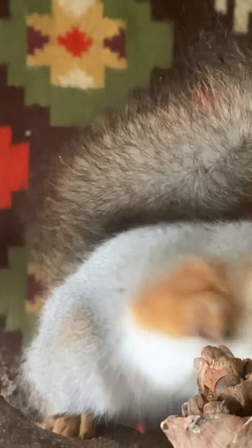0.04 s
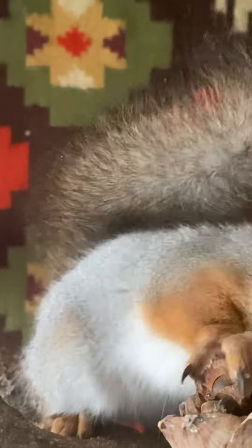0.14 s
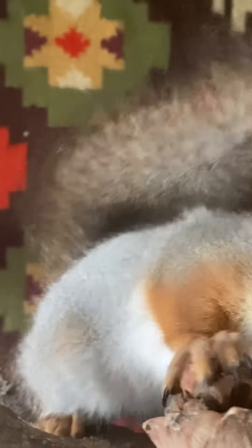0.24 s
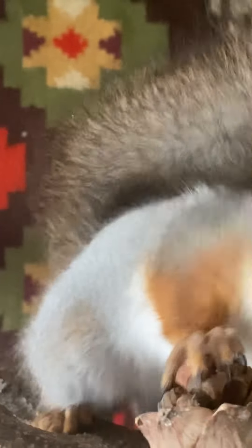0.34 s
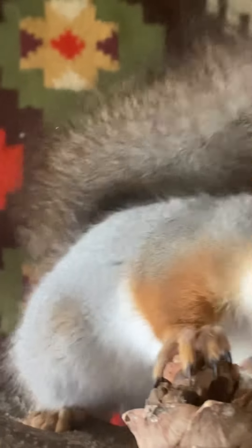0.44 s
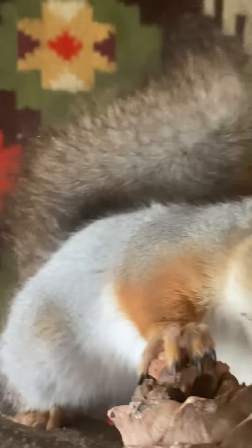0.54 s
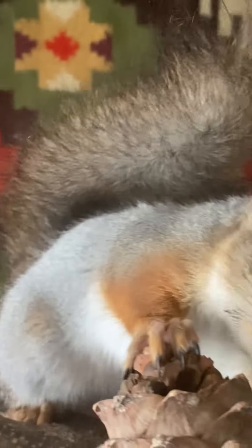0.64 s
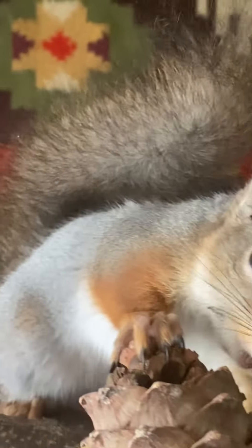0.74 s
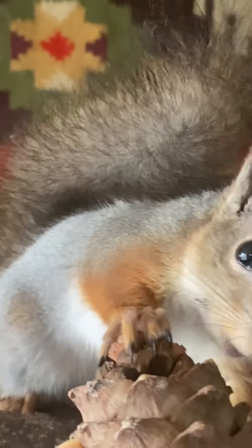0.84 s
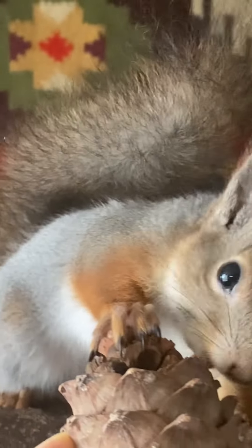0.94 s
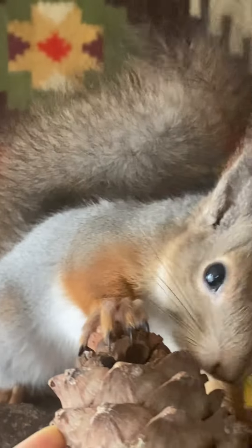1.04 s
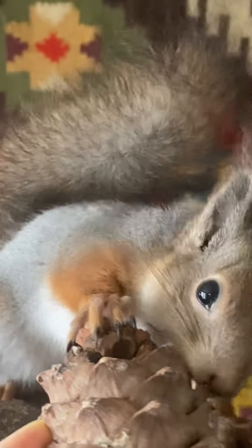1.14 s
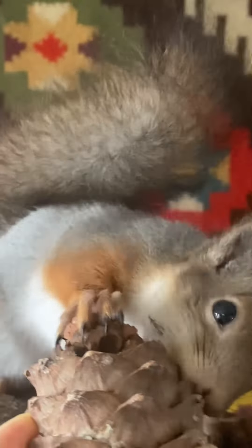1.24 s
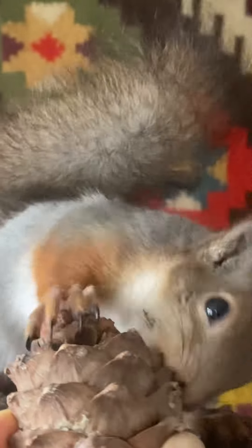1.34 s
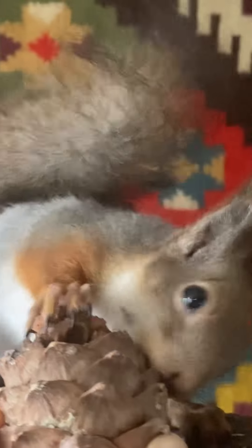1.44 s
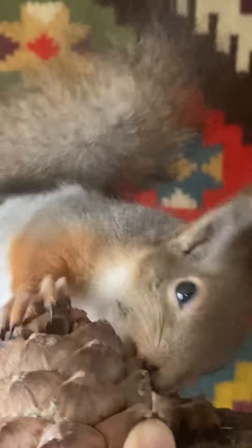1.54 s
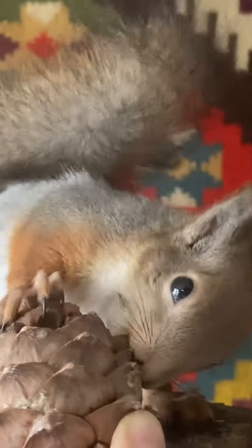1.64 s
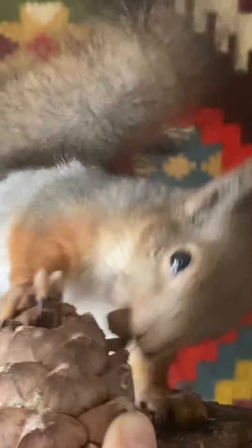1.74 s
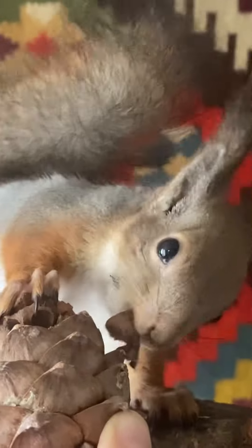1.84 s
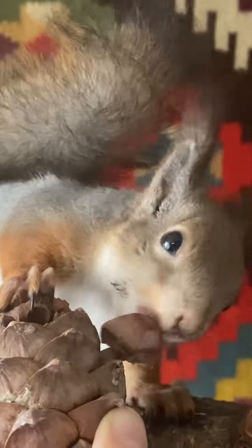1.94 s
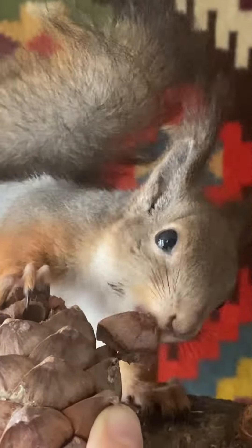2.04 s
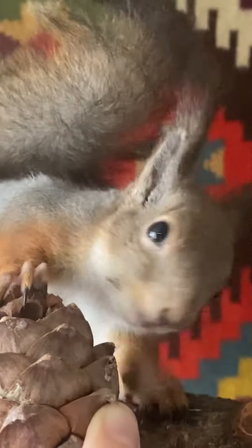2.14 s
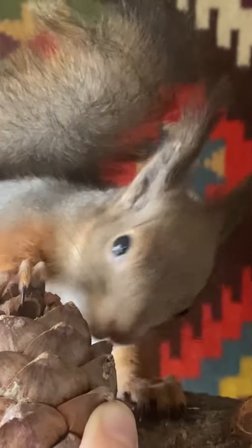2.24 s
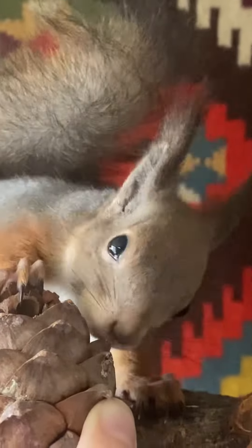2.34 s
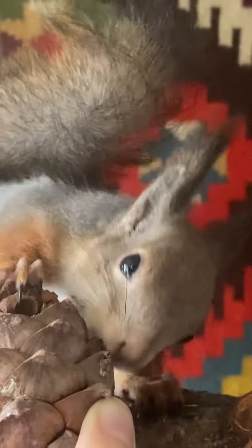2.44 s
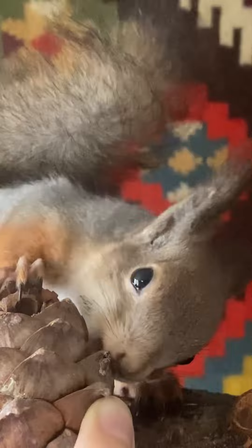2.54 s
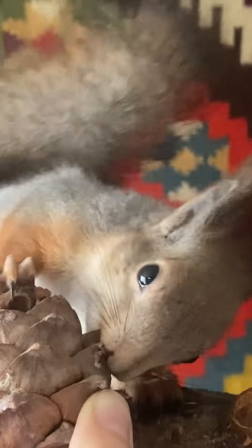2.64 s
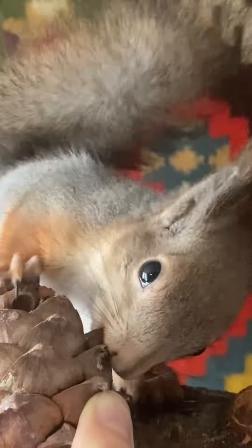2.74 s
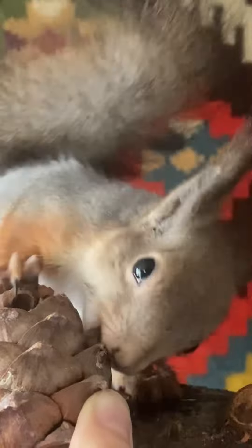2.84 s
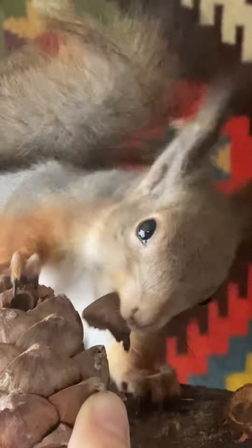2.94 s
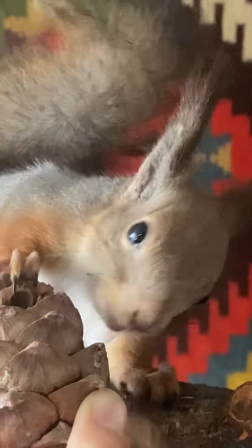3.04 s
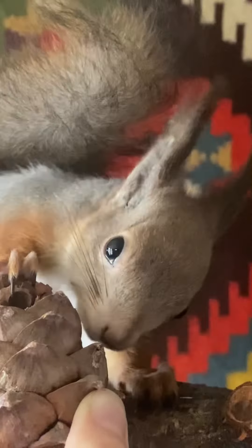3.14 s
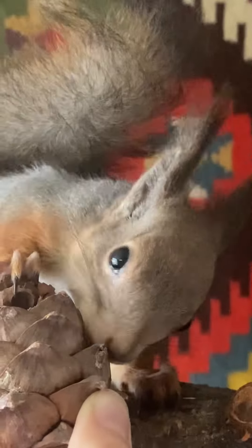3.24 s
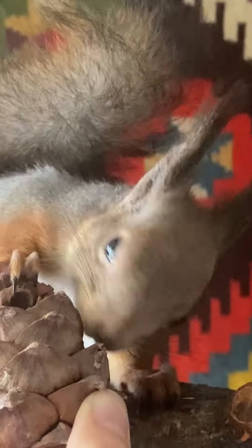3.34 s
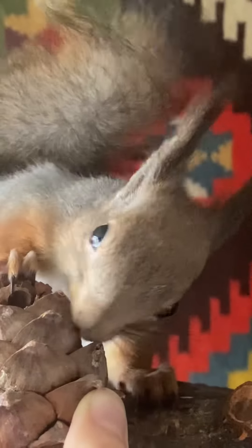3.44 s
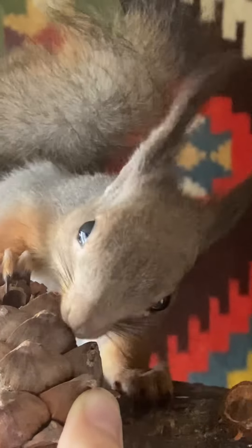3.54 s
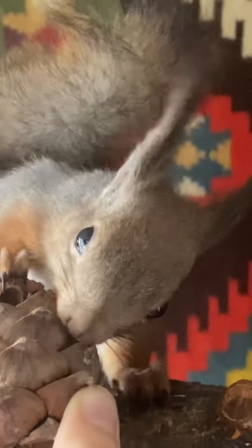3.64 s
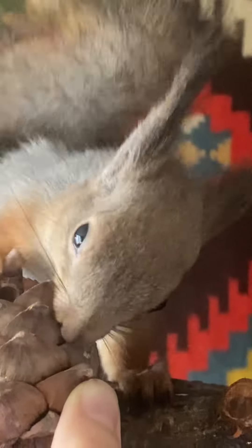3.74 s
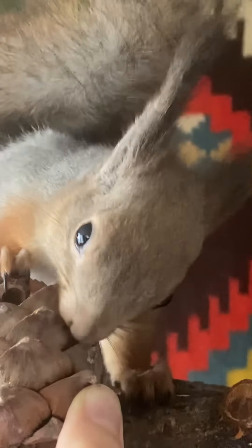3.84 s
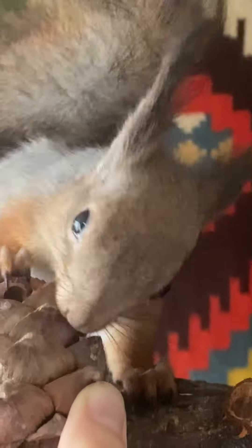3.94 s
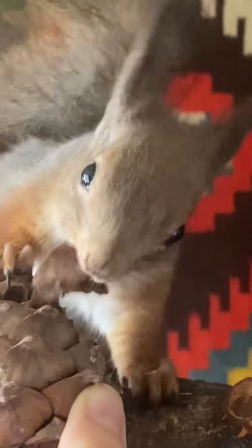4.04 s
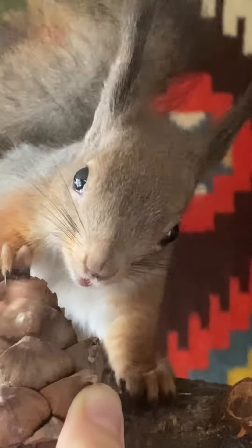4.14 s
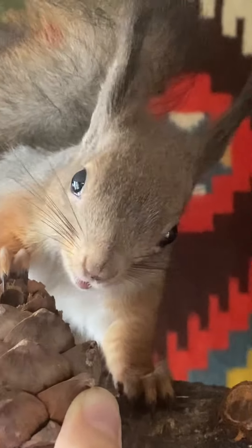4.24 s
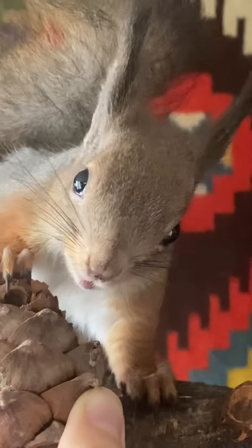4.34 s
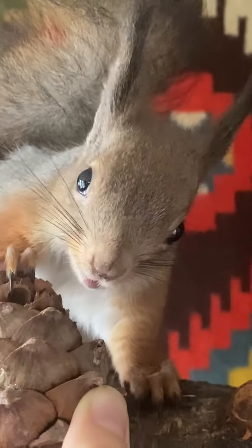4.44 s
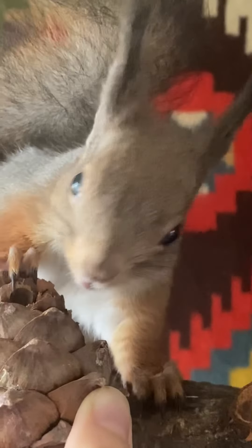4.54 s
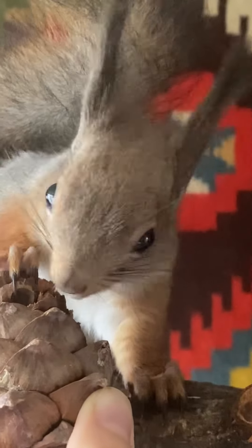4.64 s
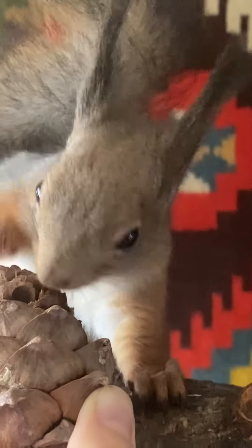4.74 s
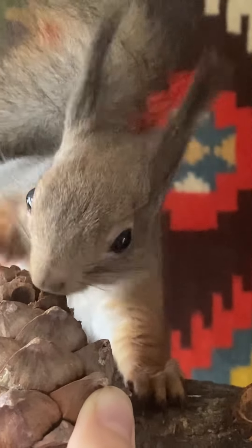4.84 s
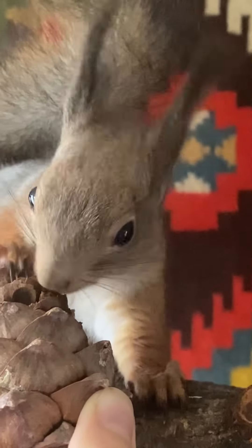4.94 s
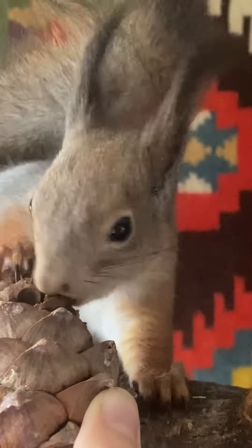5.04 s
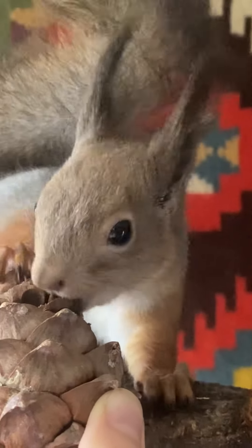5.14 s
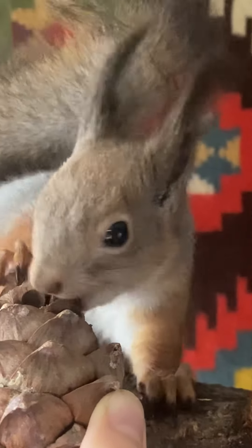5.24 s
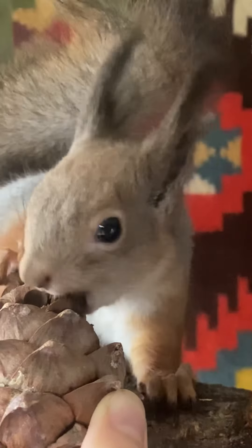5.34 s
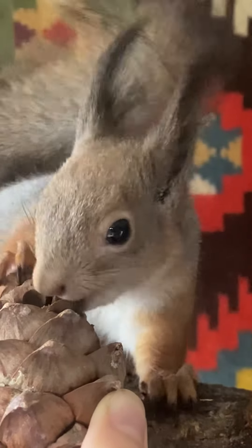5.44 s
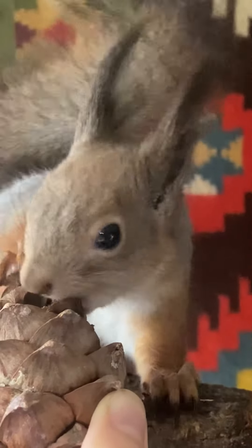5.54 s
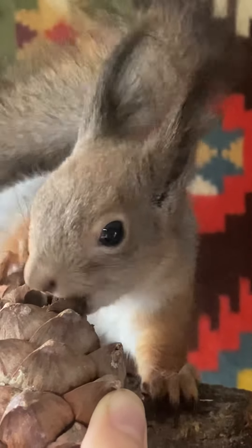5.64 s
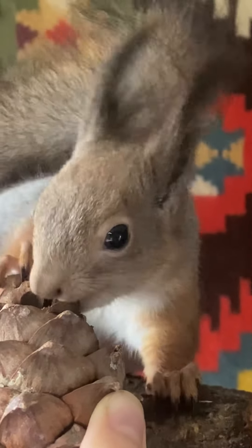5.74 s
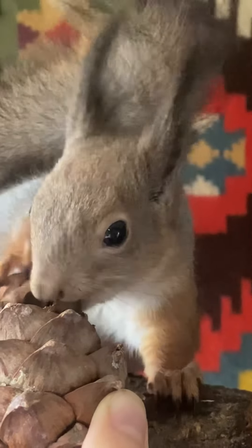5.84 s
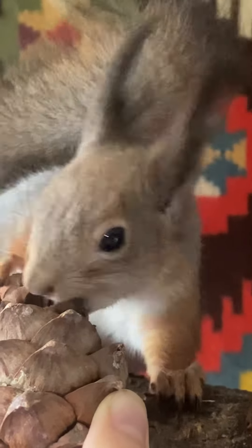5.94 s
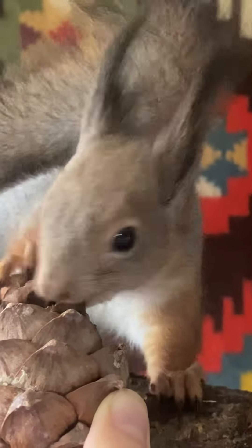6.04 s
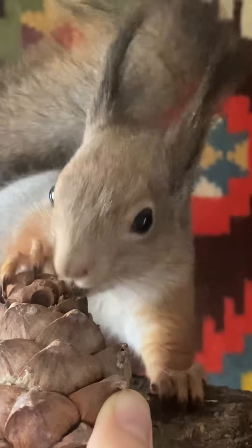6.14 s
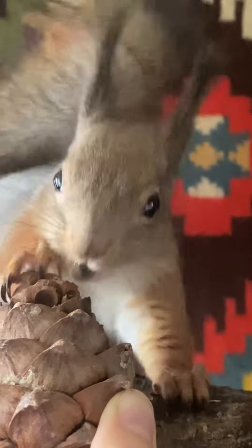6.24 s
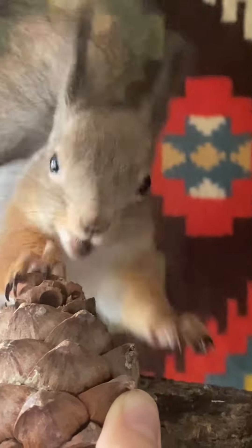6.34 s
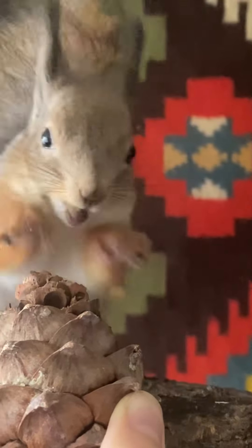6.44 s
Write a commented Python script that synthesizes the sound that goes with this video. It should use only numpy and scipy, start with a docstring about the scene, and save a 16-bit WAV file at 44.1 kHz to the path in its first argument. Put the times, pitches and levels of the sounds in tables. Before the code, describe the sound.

Very close to a stereo microphone pair in a small, damped room, a squirrel gnaws a pine cone. A flurry of bright dry cracks comes first, then a near-silent gap, then stronger clusters of snapping with scraping and small knocks. After about four seconds it thins to faint ticks, with one distinct clack near five seconds. A soft low hum continues underneath.

```python
"""In a small, well-damped room a squirrel gnaws a pine cone a hand's width from two closely spaced microphones.
Its teeth snap the woody scales in bursts of dry cracks: noise bursts a few milliseconds long, each tinted by a resonance.
Between the bites come tiny ticks and rustle, noise whose level follows bouts of effort.
Scales tear, shift and drop with duller knocks, a contact tick plus a diffuse clatter that fills the room.
A low hum of shaped noise and two wavering tones lies under it all."""
import sys
import numpy as np
from scipy.fft import rfft, irfft, next_fast_len
from scipy.io import wavfile
from scipy.ndimage import uniform_filter1d, map_coordinates

SR = 44100
rng = np.random.default_rng(int(sys.argv[2]) if len(sys.argv) > 2 else 0)


def transcribe(signal):
    """Save signal, clipped to [-1, 1], as a 16-bit WAV file at the path in sys.argv[1]."""
    frames = np.atleast_2d(signal).T
    limited = np.clip(frames, -1, 1)
    pcm = np.round(limited * 32767).astype(np.int16)
    wavfile.write(sys.argv[1], SR, pcm)


N = 286209  # length of the scene [samples]

# Teeth snapping fibres, direct sound:
# (time [s], level over 2 ms [dB], brightness [dB per octave], pitch of the breaking piece [Hz])
CRACKS = [(0.1248, -52.5, -5.5, 9100), (0.155, -51, 1, 9700), (0.1807, -25, 1, 10800),
          (0.205, -36, 7.5, 10000), (0.22, -48, -2, 6800), (0.2345, -39, 8.5, 9700),
          (0.2385, -36.5, 1, 9700), (0.251, -26, 7.5, 9500), (0.2556, -28, 3.5, 900),
          (0.285, -38.5, 5.5, 9600), (0.301, -26, 3.5, 9700), (0.3053, -26, 3, 1450),
          (0.4212, -40.5, 3.5, 10000), (0.4361, -48.5, -4.5, 6300), (0.5957, -56.5, 3, 11900),
          (0.6712, -54, -1.5, 5300), (0.686, -55.5, -2, 5830), (0.7468, -56.5, -1.5, 9900),
          (0.809, -58.5, 3, 3530), (0.8588, -52, 6, 6300), (1.0096, -61.5, -6, 5900),
          (1.0423, -53.5, -1, 6660), (1.2803, -23.5, -0.5, 7500), (1.289, -37, -2.5, 8650),
          (1.3253, -46, -7, 1130), (1.423, -51.5, -4, 5100), (1.5145, -47, 2.5, 6800),
          (1.5726, -21, 6, 7750), (1.5845, -35, 0, 6300), (1.601, -36.5, 3.5, 9700),
          (1.604, -20.5, 1.5, 4400), (1.6116, -24, 1.5, 5900), (1.651, -40.5, -1, 12000),
          (1.7066, -25.5, 1.5, 4900), (1.85, -50, -12, 1920), (1.9224, -50.5, -6, 10000),
          (2.1414, -45, -5.5, 4300), (2.165, -53.5, -8.5, 7350), (2.172, -35, 7, 6700),
          (2.4265, -50, -2.5, 3330), (2.5065, -43, -1.5, 4400), (2.5719, -26, 5, 2500),
          (2.6024, -33.5, -1.5, 7800), (2.6113, -29.5, 2, 6940), (2.6148, -21, 5, 8650),
          (2.6363, -31.5, 4.5, 2100), (2.6542, -33.5, 3.5, 6200), (2.662, -19, 0, 6700),
          (2.671, -39, 5, 900), (2.7639, -32, -7, 2010), (2.8518, -25.5, 2, 3870),
          (2.8546, -34, -3.5, 6000), (2.9603, -46, -12.5, 2540), (3.225, -55.5, 4, 8300),
          (3.262, -59.5, -3.5, 2080), (3.4409, -40.5, -1.5, 7900), (3.5755, -45.5, -3.5, 10100),
          (3.6628, -26, -2, 12700), (3.6901, -30, 3, 2900), (3.705, -38, -2, 12100),
          (3.7244, -23, 1, 15000), (3.7472, -40.5, -4.5, 11000), (3.7527, -25.5, -0.5, 15000),
          (3.7545, -33.5, -1.5, 1090), (3.9542, -38, 1, 11000), (3.959, -29.5, -2, 10900),
          (3.9625, -38.5, -3, 9700), (4.0518, -51.5, 0.5, 900), (4.0764, -49.5, 0.5, 7600),
          (4.1101, -37, -5.5, 7640), (4.129, -48.5, -4.5, 5760), (4.1604, -44.5, -4, 7300),
          (4.2323, -40, 0, 4620), (4.612, -61.5, 3.5, 15200), (4.9474, -29.5, -5.5, 7000),
          (5.1206, -46.5, -8.5, 6160), (5.219, -46, 4, 2300), (5.3295, -48, -1, 4360),
          (5.456, -49, -4, 6800), (5.5078, -49.5, -1.5, 3400), (5.6561, -50.5, 4, 3500),
          (5.6686, -46.5, -5, 3140), (5.7614, -54, 10.5, 970), (5.82, -50, -1, 9700),
          (5.951, -44.5, -5, 7900), (5.9596, -47.5, -3.5, 5040)]


def bites(room_db=-20, room_slope=0.93):
    """Every snap reaches the ports directly, then the room answers; dull snaps stir it more."""
    times, levels, slopes, pitches = np.transpose(CRACKS)
    direct = snaps(np.array(CRACKS), rise=.00018, t60=.0018, strain_db=-26.5,
                   ring_db=-17, ring_t60=0.009, pitch_db=5)
    echo_levels = levels + room_db - .5 * slopes
    echo_slopes = room_slope + 0.71 * slopes
    echoes = np.transpose([times, echo_levels, echo_slopes, pitches])
    return direct + tails(echoes, rise=0.00017, t60=0.058, grain_db=2.5, pitch_db=-3.5)


# Colour of a snap: (frequency [Hz], level per Hz [dB])
SNAP_COLOUR = [(150, -40), (500, -20), (800, -16), (1200, -10), (1700, -5), (2400, -5), (3200, -5),
               (5000, -4), (6300, -2), (8500, 0), (10500, -3), (12500, -8), (15500, -9), (16800, -18)]
# Sound straight from the cone: (frequency [Hz], phase by which the left port leads [rad])
LEFT_LEAD = [(100, 0), (780, .7), (1200, -1.0), (1720, .1), (2500, .75), (3900, .4), (5000, 1.8),
             (5700, 1.6), (8100, 2.6), (10300, 3.1), (12700, 3.8), (15100, 5.1)]


def snaps(events, rise, t60, strain_db, ring_db, ring_t60, pitch_db):
    """Fibres strain, part abruptly, and the scale rings on briefly; rise and t60s in seconds."""
    lead_in, span = .005, .002  # time kept before the break, time over which level is counted [s]
    t = np.arange(SR // 44) / SR - lead_in
    strain = amp(strain_db) * np.exp(-abs(t) / 0.00093)
    ring = amp(ring_db - 60 * abs(t) / ring_t60)
    onset = np.exp(-abs(t) / rise)
    decay = amp(-60 * abs(t) / t60)
    shape = strain + np.where(t < 0, onset, decay + ring)
    spectra = rfft(rng.standard_normal((len(events), 1, len(t))) * shape)
    # so sudden a break excites all frequencies about evenly: flatten each spectrum
    bursts = irfft(spectra / uniform_filter1d(abs(spectra), size=50))

    def colour_at_ports(hz):
        ports = np.exp(.5j * np.outer([1, -1], along(LEFT_LEAD, hz)))
        return amp(along(SNAP_COLOUR, hz)) * timbre(events, hz, pitch_db) * ports
    bursts = filtered(bursts, colour_at_ports)
    return placed(bursts, events[:, 0] - lead_in, events[:, 1], span)


# Scales scuffing and dropping, diffuse clatter:
# (time [s], level over 20 ms [dB], brightness [dB per octave], pitch of the scale [Hz])
KNOCKS = [(0.311, -51.5, -5.5, 6660), (1.115, -59.5, -4.5, 5050), (1.184, -41.5, -5, 10000),
          (1.435, -49.5, -2, 3270), (1.649, -41, -4, 5240), (1.699, -42, -2, 7100),
          (1.848, -53.5, -8, 1880), (1.888, -57, -7.5, 3900), (2.065, -56.5, -3.5, 885),
          (2.763, -43, -4, 2050), (2.769, -41.5, -6.5, 2640), (2.952, -51.5, -2.5, 6600),
          (3.008, -59.5, -9, 7500), (3.045, -54, -2.5, 1274), (3.163, -58.5, -5.5, 8900),
          (3.724, -42, -7, 714), (3.807, -55, -3, 2900), (3.825, -54.5, -2.5, 2620),
          (3.872, -52.5, -5, 3100), (3.918, -56, -2.5, 2290), (4.824, -62, -0.5, 3680),
          (4.9499, -32.5, -2, 3570), (5.111, -48, -4, 2080), (5.219, -53.5, -7, 9700),
          (5.266, -59.5, -8, 8900), (5.329, -53, -2.5, 9300), (5.355, -53, -3.5, 3960),
          (5.384, -57.5, -3.5, 8450), (5.514, -59.5, -7, 3480), (5.559, -55.5, -1, 1860),
          (5.644, -56, -2, 4170), (5.885, -65, -3, 7900), (5.926, -61.5, -4, 3660), (6.013, -55, -5, 8900),
          (6.076, -64.5, 3, 9170), (6.395, -69, 1.5, 8070)]


def knocks(contact_db=-4, contact_slope=-3):
    """A loosened scale scuffs or lands: a small contact tick and a broad, quickly dying clatter."""
    clatter = np.array(KNOCKS)
    ticks = clatter + [.001, contact_db, contact_slope, 0]  # 1 ms later, with level and tilt offset
    contact = snaps(ticks, rise=0.00045, t60=0.0063, strain_db=-16.5,
                    ring_db=-37.5, ring_t60=0.0066, pitch_db=10)
    return contact + tails(clatter, rise=0.002, t60=0.12, grain_db=-1.5, pitch_db=5)


# Colour of a knock or echo: (frequency [Hz], level per Hz [dB])
THUD_COLOUR = [(120, -28), (300, -16.5), (500, -10), (800, -5), (1200, -5.5), (1800, -2.5), (2400, -5),
               (3200, -4.5), (4500, -10), (6800, 0), (9000, -19), (11000, -8), (13000, -27.5), (16000, -29)]
# Hollow ring of the knocked wood: (frequency [Hz], width [Hz], gain against the unresonant sound [dB])
WOOD_MODES = [(860, 60, -34.5), (1828, 160, -12), (2420, 90, -6.5), (2740, 72, -8.5), (3200, 110, -5.5),
              (3900, 51, 7), (4360, 50, 5)]


def tails(events, rise, t60, grain_db, pitch_db):
    """Dense, uneven reflections off near surfaces, new for each blow and coloured by the wood."""
    t = np.arange(SR // 7) / SR
    steps = rng.standard_normal((len(events), 1, len(t) // 20 + 1))
    grain = np.repeat(steps, 20, axis=2)[..., :len(t)]  # level jumps every 20 samples
    shape = (1 - np.exp(-t / rise)) * amp(-60 * t / t60 + grain_db * grain)
    bursts = surround(rng.standard_normal((len(events), 2, len(t)))) * shape

    def colour(hz):
        wood = 1 + sum(amp(db) * resonance(hz, centre, width) for centre, width, db in WOOD_MODES)
        return amp(along(THUD_COLOUR, hz)) * wood * timbre(events, hz, pitch_db)
    return placed(filtered(bursts, colour), events[:, 0], events[:, 1], 1 / 50)


# Colour of the rustle: (frequency [Hz], level per Hz [dB])
RUSTLE_COLOUR = [(400, -25), (1200, -8), (2000, -3), (3500, 0), (5000, -2), (7000, 1), (9000, -4),
                 (11000, -8), (13000, -19), (16000, -25)]


def nibbling(rustle_db=-3, rasp_db=5, stroke_db=4.0, tick_db=-69, tick_follows=0.69, scatter_db=4.0,
             tick_slope=-6.0, slope_spread=3, count=220):
    """Fibres catch and slip under teeth and claws: a grainy rasp that follows the effort, with tiny ticks."""
    flutter_db = rasp_db * wobble(600) + stroke_db * wobble(45)  # fine grain and slower strokes
    rasp = unit(amp(flutter_db) * wash(RUSTLE_COLOUR))
    rustle = amp(rustle_db) * effort(np.arange(N) / SR) * rasp
    when, size, colour, piece = rng.random((count, 4)).T
    times = (np.arange(count) + when) / count * N / SR  # one tick at random in each equal slot
    effort_db = 20 * np.log10(effort(times))
    follow_db = tick_follows * (effort_db - np.median(effort_db))
    levels = tick_db + follow_db - scatter_db * np.log(size + 0.036)  # mostly faint, a few louder
    slopes = tick_slope + slope_spread * (2 * colour - 1)
    pitches = 2500 * 2 ** (2 * piece)  # two octaves [Hz]
    ticks = np.transpose([times, levels, slopes, pitches])
    return rustle + snaps(ticks, rise=0.0004, t60=0.004, strain_db=-16,
                          ring_db=3.5, ring_t60=0.047, pitch_db=4)


# Bouts of teeth and claws working on the cone: (start time [s], length [s], effort [dB])
BOUTS = [(0.003, 0.21, -68), (0.2, 0.16, -67.5), (0.35, 0.099, -76), (0.566, 0.19, -81.5),
         (0.804, 0.6, -86), (1.259, 0.091, -60.5), (1.467, 0.18, -59.5), (1.865, 0.083, -65),
         (2.078, 0.58, -75), (2.57, 0.07, -58.5), (2.69, 0.21, -63), (2.93, 0.17, -77),
         (3.343, 0.33, -71.5), (3.688, 0.31, -63.5), (4.018, 0.26, -76.5), (4.663, 0.22, -76),
         (5.037, 0.7, -68.5), (5.83, 0.29, -66.5)]
BOUT_ATTACK_S, BOUT_RELEASE_S = 0.012, 0.013  # how fast a bout sets in and dies away
GRIP_DB = -100  # claws merely holding the cone


def effort(t):
    """How hard the cone is worked at times t, as a gain: each bout rises, holds and dies away."""
    total = amp(GRIP_DB)
    for start, length, db in BOUTS:
        before = np.maximum(start - t, 0) / BOUT_ATTACK_S
        after = np.maximum(t - start - length, 0) / BOUT_RELEASE_S
        total = total + amp(db) * np.exp(-(before + after))
    return total


# Colours of the rumble, the hum and the room's hiss: (frequency [Hz], level per Hz [dB])
RUMBLE_COLOUR = [(18, -36), (26, -8.5), (35, 1), (45, 4.5), (55, -0.5), (68, 6.5), (85, 6), (100, -5.5),
                 (125, -27.5), (400, -120)]
HUM_COLOUR = [(70, -2.5), (110, -1.5), (135, -1.5), (160, 3), (195, 0), (225, -0.5), (285, -1), (325, -4.5),
              (380, -10), (470, -10), (530, -13.5), (620, -16.5), (750, -20), (1200, -93)]
HISS_COLOUR = [(200, -20), (500, -2), (900, 0), (1300, -4.5), (2000, -18.5), (2500, -25), (4500, -30),
               (7000, -34), (9000, -43), (16000, -56)]
# The hum's lasting tones: (frequency [Hz], level about which each wavers [dB])
HUM_TONES = [(44.5, -59.5), (166, -68.5)]
RUMBLE_DB, RUMBLE_SWING_DB, RUMBLE_SWELLS_PER_S = -51, 2.5, 7.2
HISS_DB = -66


def hum(hum_db=-54.0):
    """The low drone of the room: swelling rumble, a wavering hum with its tones, and faint hiss."""
    t = np.arange(N) / SR
    swell = amp(RUMBLE_SWING_DB * wobble(RUMBLE_SWELLS_PER_S))
    rumble = amp(RUMBLE_DB) * unit(swell * wash(RUMBLE_COLOUR))
    drone = amp(hum_db + 0.8 * wobble(4.7)) * wash(HUM_COLOUR)
    tones = np.zeros(N)
    for hz, db in HUM_TONES:
        level = amp(db + 2 * wobble(2.4)) * np.sqrt(2)  # rms to peak
        tones += level * np.sin(2 * np.pi * hz * t + 1.5 * wobble(5))
    return rumble + drone + tones + amp(HISS_DB) * wash(HISS_COLOUR)


def wash(spectrum):
    """Steady diffuse noise of rms 1."""
    noise = surround(rng.standard_normal((2, N)))
    return unit(filtered(noise, lambda hz: amp(along(spectrum, hz))))


# Sound arriving from all round: (frequency [Hz], side minus mid level [dB])
SPREAD = [(60, -36), (110, -29), (200, -20), (380, -9), (700, 1), (1290, 2), (2380, -6), (4400, -3),
          (6000, 0), (8120, 6), (10000, 11), (12000, 7), (15000, 0)]


def surround(pair):
    """Two unrelated noises, as mid and side, become a diffuse field at the two ports."""
    def shares(hz):
        side = amp(along(SPREAD, hz))
        return np.array([np.ones_like(side), side]) / np.hypot(1, side)
    return np.array([[1, 1], [1, -1.07]]) @ filtered(pair, shares)


def timbre(events, hz, pitch_db, sharpness=4.4):
    """Each event's own colour: a treble tilt and the resonance of the piece that moves."""
    slope, pitch = np.transpose(events)[2:, :, None, None]
    octaves = np.log2(np.clip(hz, 1200, 14000) / 4000)
    return amp(slope * octaves) * (1 + amp(pitch_db) * resonance(hz, pitch, pitch / sharpness))


def resonance(hz, centre_hz, width_hz):
    """One damped mode, of gain 1 at its centre."""
    return 1j * hz * width_hz / (centre_hz ** 2 - hz ** 2 + 1j * hz * width_hz)


def placed(bursts, times, db, span):
    """Stereo bursts laid out in time, each with the energy of level db held for span seconds."""
    energy = np.sum(bursts ** 2, axis=(1, 2)) / 2
    gains = amp(db) * np.sqrt(span * SR / (energy + 1e-20))
    out = np.zeros((2, N + SR))
    for burst, s, gain in zip(bursts, times, gains):
        first = max(round(s * SR), 0)
        out[:, first:][:, :burst.shape[1]] += gain * burst
    return out[:, :N]


def filtered(x, response):
    """x shaped by a response of frequency, along the last axis."""
    n = x.shape[-1]
    m = next_fast_len(n + n // 4)
    return irfft(rfft(x, m) * response(np.fft.rfftfreq(m, 1 / SR)), m)[..., :n]


def wobble(rate):
    """A smooth random curve, rate knots a second."""
    knots = rng.standard_normal(int(N * rate / SR) + 4)
    return map_coordinates(knots, [np.arange(N) * rate / SR])


def along(points, hz):
    """Read a curve of (frequency [Hz], value) points at hz, on a log frequency axis."""
    f, v = np.transpose(points)
    return np.interp(np.log(hz + 1), np.log(f + 1), v)


def amp(db):
    """Decibels to a gain."""
    return 10 ** (np.asarray(db) / 20)


def unit(x):
    """x scaled to rms 1."""
    return x / np.sqrt(np.mean(x ** 2) + 1e-20)


def scene():
    """Bites, knocks and nibbling over the room's hum."""
    return bites() + knocks() + nibbling() + hum()


TOP_HZ = 16900  # nothing passes above this


def record(dry):
    """The treble fades out steeply over the last kilohertz below the band limit."""
    return filtered(dry, lambda hz: np.clip((TOP_HZ - hz) / 1000, 0, 1) ** 2)


dry = scene()
out = record(dry)
transcribe(out)
```